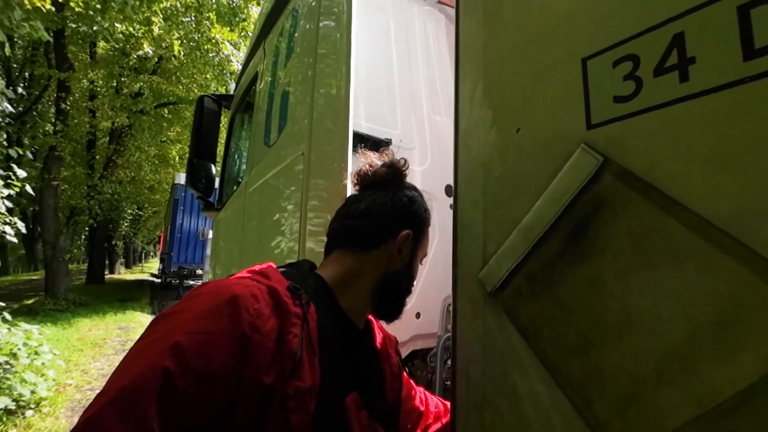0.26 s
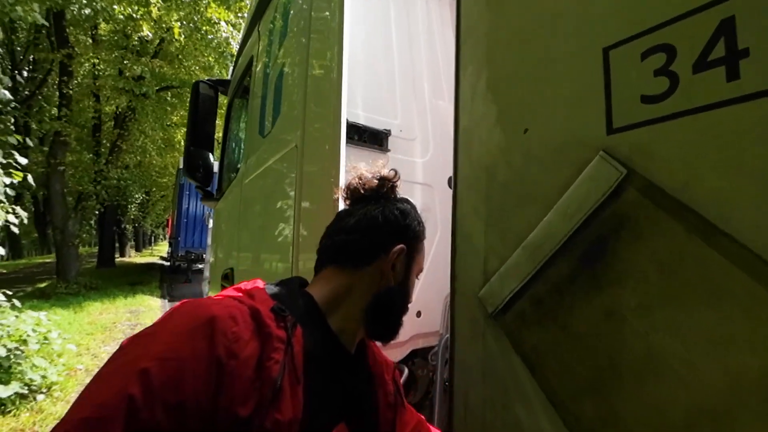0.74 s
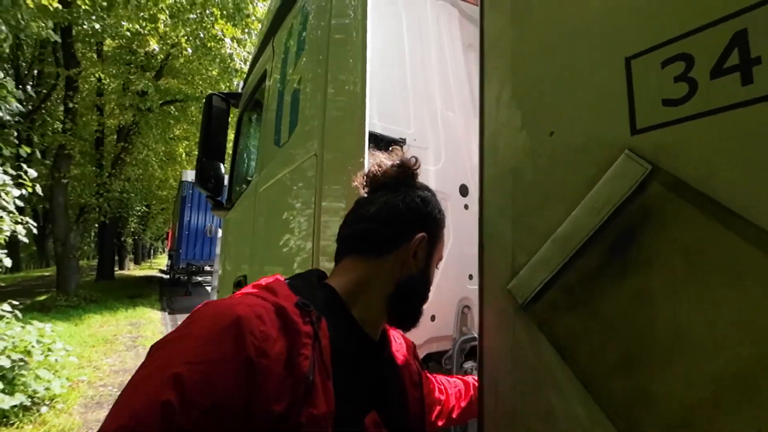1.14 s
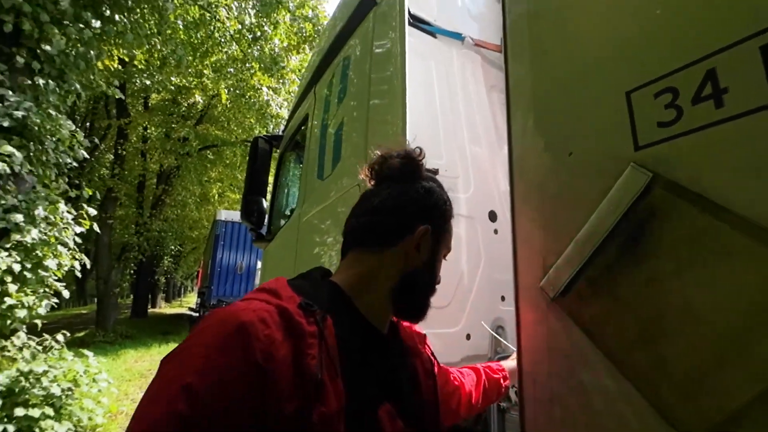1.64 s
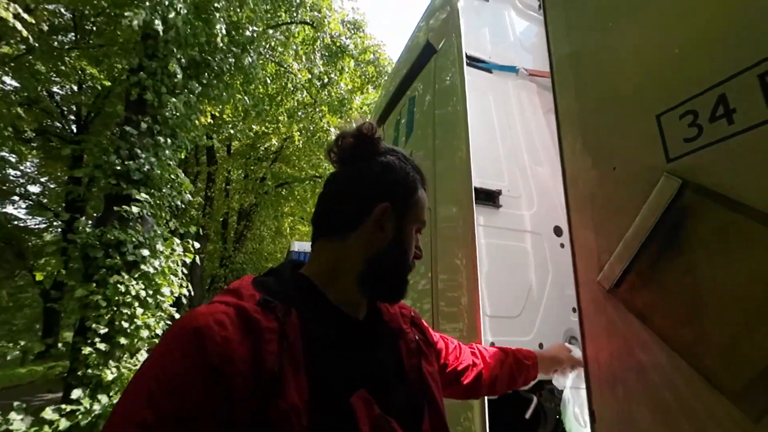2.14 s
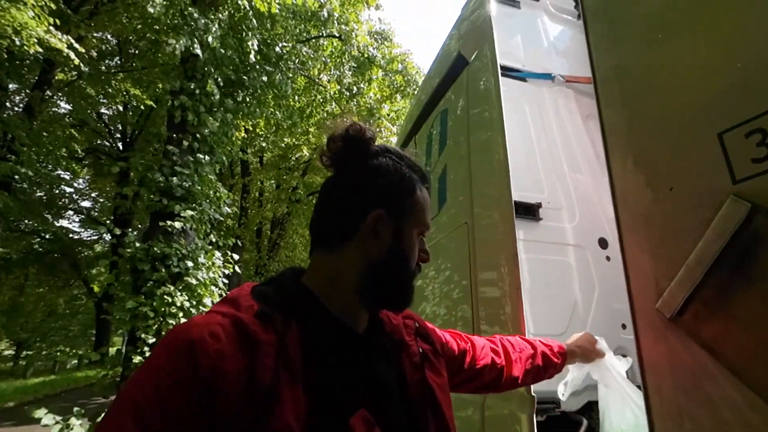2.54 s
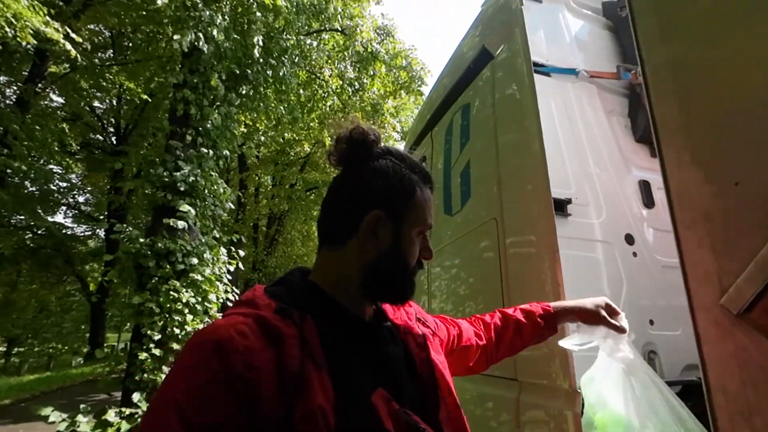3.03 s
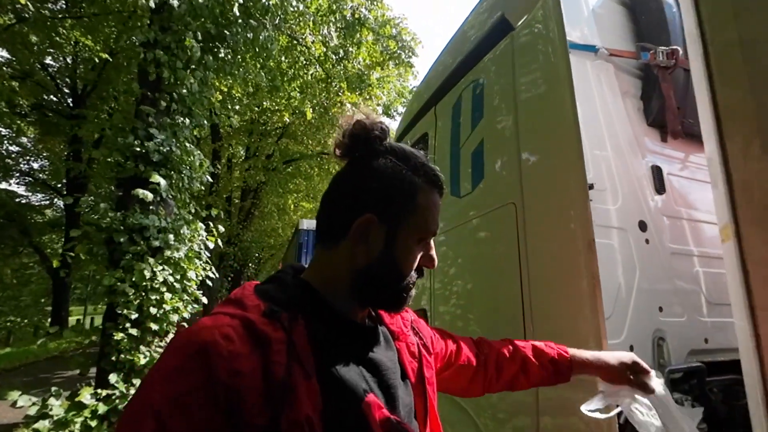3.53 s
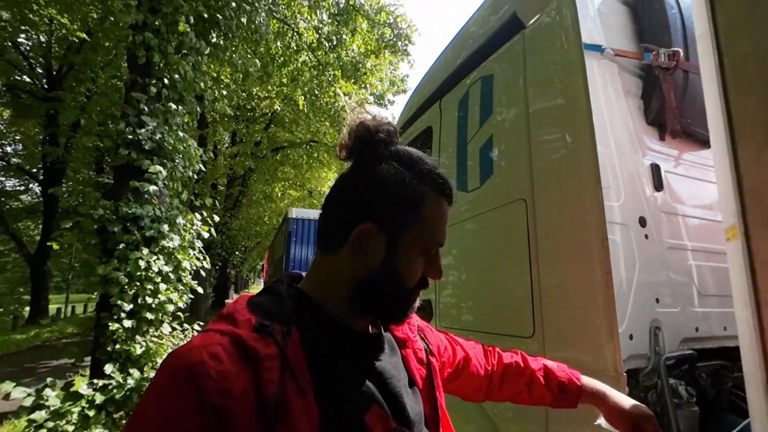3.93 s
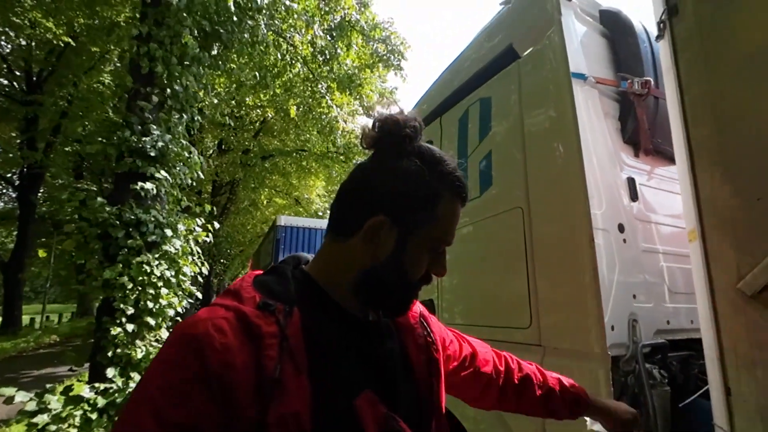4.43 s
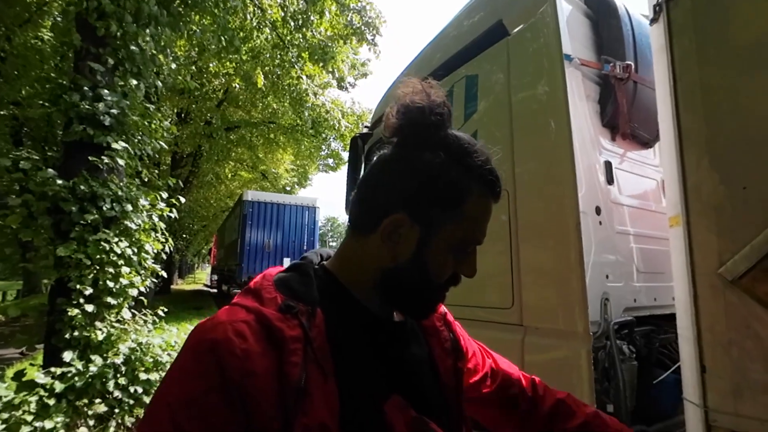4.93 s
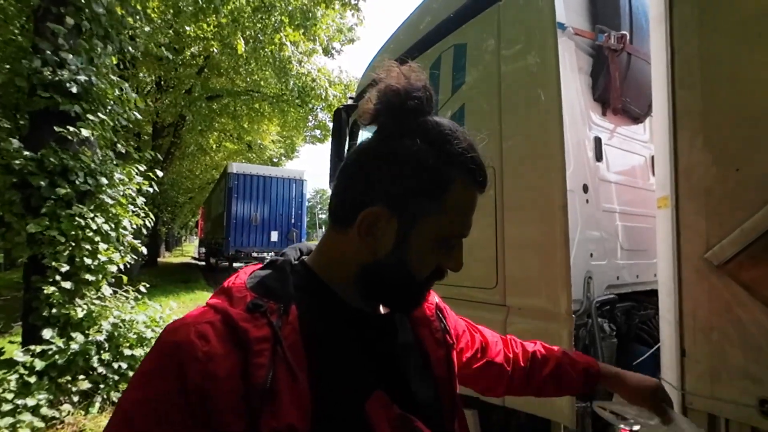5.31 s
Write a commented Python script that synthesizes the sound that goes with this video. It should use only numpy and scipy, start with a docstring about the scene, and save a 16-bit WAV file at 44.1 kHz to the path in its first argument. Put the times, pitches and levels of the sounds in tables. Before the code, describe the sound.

In a narrow metal gap behind a lorry cab, light empties bump with dry, hollow, pitched knocks and a short glassy ring. The bag rustles lightly between them. From just past halfway the knocking stops and sharp plastic crunches dominate, wind buffeting the close stereo microphone, before two small clinks near the end. Tree hush stays quiet underneath.

```python
"""In the gap behind a lorry cab, empty plastic bottles and cans knock together in a thin bag. Wind rumble and
tree hush are shaped noise, with single low puffs and thumps. The bag rustles and crunches: random snaps of
film, which also sound the air caught inside. Each knock is a noise burst with wall modes and a pitched ring;
short pings and longer rings join in."""
import sys
import numpy as np
from scipy import signal
from scipy.fft import rfft, irfft, next_fast_len
from scipy.io import wavfile
from scipy.ndimage import uniform_filter1d

SR = 44100
rng = np.random.default_rng(int(sys.argv[2]) if len(sys.argv) > 2 else 0)


def pcm_store(signal):
    """Save signal as 16-bit PCM."""
    levels = np.round(np.clip(np.atleast_2d(signal), -1, 1) * 32767)
    wavfile.write(sys.argv[1], SR, levels.astype(np.int16).T)


N = 245503  # samples


def amp(db):
    """Decibels to a linear factor."""
    return 10 ** (np.asarray(db) / 20)


def evened(x):
    """Scales a sound to an RMS of one."""
    return x / np.sqrt(np.mean(x ** 2) + 1e-20)


def read(points, hz):
    """Reads a frequency table with straight lines over log frequency."""
    f, value = np.transpose(points)
    return np.interp(np.log(hz + 1), np.log(f + 1), value)


def level_curve(points):
    """Linear level over the whole scene, drawn with straight lines in dB."""
    start_s, level_db = np.transpose(points)
    return amp(np.interp(np.arange(N) / SR, start_s, level_db))


def coloured(x, db_at):
    """Filters each row of x by a level rule over frequency, without phase shift."""
    size = next_fast_len(x.shape[-1])
    gain = amp(db_at(np.fft.rfftfreq(size, 1 / SR)))
    return irfft(rfft(x, size) * gain, size)[..., :x.shape[-1]]


def wander(shape, width, depth_db):
    """Random level drift: noise averaged over width samples, swinging by depth_db RMS."""
    return amp(depth_db * evened(uniform_filter1d(rng.standard_normal(shape), width)))


def add(mix, start_s, sound):
    """Lays a stereo sound into the mix, cut off at the end of the scene."""
    part = mix[:, round(start_s * SR):][:, :sound.shape[1]]
    part += sound[:, :part.shape[1]]


# How alike left and right are before diffuseness: pitch_hz, shared (0 to 1)
LIKENESS = [(80, 1), (450, 0.92), (700, 0.7), (1150, 0.86), (1300, 1), (2500, 0.63), (5000, 0.57),
            (10000, 0.073), (15000, 0.76)]
# Full shadow between the two ports: pitch_hz, left_minus_right_db
SHADOW = [(500, 0), (1000, -0.5), (2300, -1.5), (3000, -4), (9300, -3), (9700, 0.5)]
# Directions: left lag in the upper band (s), diffuseness (power of likeness), share of the shadow
FROM_GAP, FROM_BAG, FROM_TREES = (55e-6, .9, .8), (70e-6, 1., 1.13), (15e-6, 3, 0.4)


def ports(pair, direction):
    """Turns two versions of a sound into left and right by shared part, path lag and shadow."""
    size = next_fast_len(N)
    lag_s, diffuseness, shade = direction
    hz = np.fft.rfftfreq(size, 1 / SR)
    shared = np.clip(read(LIKENESS, hz), 0, 1 - 1 / 200) ** diffuseness
    first, second = rfft(pair, size)
    stretch = np.interp(hz, [1120, 1280], [4., 1])  # the lag is longer in the lower band
    # half of the lag and shadow goes to each side
    half = amp(shade * read(SHADOW, hz) / 2) * np.exp(-1j * np.pi * hz * lag_s * stretch)
    left = first * half
    right = (shared * first + np.sqrt(1 - shared ** 2) * second) / half
    return irfft(np.array([left, right]), size)[:, :N]


# Wind level, joined by straight lines: start_s, level_db
GUSTS = [(0, -41.5), (.9, -45.5), (1.5, -42), (1.8, -45.5), (2.9, -43.5), (3.3, -47.5), (4.3, -48),
         (4.4, -37), (4.84, -32.5), (4.88, -48), (5.0, -37.5), (5.2, -49), (5.57, -48.5)]
# Tone of the wind rumble: pitch_hz, density_db (per Hz)
WIND = [(8.8, -35), (15, 3), (54, -1), (109, -4), (204, -17.5), (274, -17), (500, -26), (650, -62),
        (1100, -120)]
# Single low puffs and thumps: centre_s, peak_db, pitch_hz
THUMPS = [(2.965, -27, 35), (3.993, -27.5, 108), (4.656, -26.5, 60), (4.693, -23.5, 45), (4.712, -23, 60),
          (4.791, -18.5, 87), (4.847, -22, 70)]
# Tone of leaves and far traffic: pitch_hz, density_db (per Hz)
HUSH = [(59, -60), (100, -15), (121, -0.5), (214, -6), (457, -9), (742, -8), (879, -12.5), (1430, -13.5),
        (1800, -15), (3120, -12), (10200, -23), (13700, -32), (15500, -72)]
HUSH_DB = -49


def outdoors():
    """Lumpy low noise makes the wind, joined by short bell-shaped low thumps; steady noise makes the hush."""
    t = np.arange(N) / SR
    rumble = evened(coloured(rng.standard_normal((2, N)), lambda hz: read(WIND, hz)))
    wind = level_curve(GUSTS) * wander(N, 2000, 2) * rumble
    for centre_s, peak_db, pitch_hz in THUMPS:
        since = t - centre_s
        bell = np.exp(-(2.05 * pitch_hz * since) ** 2)
        wind = wind + amp(peak_db) * np.cos(2 * np.pi * pitch_hz * since) * bell
    hush = evened(coloured(rng.standard_normal((2, N)), lambda hz: read(HUSH, hz)))
    return ports(wind + amp(HUSH_DB) * hush, FROM_TREES)


def resonate(x, hz, width_hz):
    """An air pocket: one resonance driven by x, evened in level."""
    r = np.exp(-np.pi * width_hz / SR)
    return evened(signal.lfilter([1, 0, -1], [1, -2 * r * np.cos(2 * np.pi * hz / SR), r * r], x))


# Steady rustle, joined by straight lines: start_s, hiss_db
RUSTLE = [(0, -44), (.28, -45.5), (.45, -55.5), (.62, -56), (.72, -42.5), (.88, -49), (1.0, -37),
          (1.2, -48), (1.5, -52), (1.6, -57), (1.9, -62), (2.15, -47), (2.6, -42), (2.8, -51.5),
          (3.05, -40.5), (3.17, -49.5), (3.63, -48.5), (3.85, -35.5), (4.4, -35.5), (5.57, -41)]
# Crunches at their loudest moment: centre_s, level_db, swell_s (time constant), body_db (against hiss)
CRUNCHES = [(.533, -51, .005, 5), (.99, -54.5, 0.043, 13.5), (2.225, -41, 0.016, -6),
            (3.215, -56.5, 0.0026, 14), (3.237, -31, 0.0093, -2), (3.318, -38, 0.021, 2),
            (3.548, -33, 0.062, -4), (3.693, -33, 0.016, 7.5), (3.996, -18.5, 0.017, 4),
            (4.348, -25, 0.016, 6), (4.43, -44.5, 0.03, 14), (4.501, -43, 0.013, 13.5),
            (4.615, -33, 0.034, 1), (4.771, -34, .017, 2.5), (4.866, -45.5, 0.0099, 13),
            (4.939, -42.5, 0.016, 13), (4.983, -23, 0.016, 4), (5.05, -39, 0.05, 6),
            (5.295, -22, 0.028, -2), (5.56, -33.5, 0.058, -4.5)]
# Tone of the creasing film: pitch_hz, density_db (per Hz)
FILM = [(150, -20), (250, -9.5), (420, -10.5), (700, -8.5), (1100, -9.5), (1300, -6), (2300, -7),
        (5500, -9), (10000, -12), (12000, -16), (14200, -19), (15000, -35), (15700, -36)]
# Air caught in the bag and bottles: pitch_hz, width_hz, level_db (within the pockets)
POUCH = [(396, 56, -2.5), (1370, 560, -6), (3300, 910, -0.5)]
RUSTLE_BODY_DB, POUCH_DB = -4, -23.5  # rustle body against its hiss; pockets against the dull film
LINGER = 1.044  # a crunch dies this many times slower than it swells
SNAPS_PER_S = 12000


def bag():
    """Dense snaps of creasing film; the same snaps sound the air pockets."""
    t = np.arange(N) / SR
    hiss = level_curve(RUSTLE)
    body = amp(RUSTLE_BODY_DB) * hiss
    for centre_s, level_db, swell_s, body_db in CRUNCHES:
        since = t - centre_s
        swell = amp(level_db) * np.exp(np.where(since < 0, since, -since / LINGER) / swell_s)
        hiss = hiss + swell
        body = body + swell * amp(body_db)

    strength = amp(2.9 * np.minimum(rng.exponential(1, (2, N)), 5))
    snaps = strength * (rng.random((2, N)) < SNAPS_PER_S / SR) * rng.choice([-1., 1.], (2, N))
    film = evened(coloured(snaps, lambda hz: read(FILM, hz)))
    dull = coloured(film, lambda hz: -10 * np.log10(1 + (hz / 3000) ** 4))
    fine = coloured(film, lambda hz: -10 * np.log10(1 + (8500 / (hz + 1)) ** 8))  # smallest creases
    middle = film - dull - fine
    pockets = sum(amp(db) * resonate(dull, hz, width_hz) for hz, width_hz, db in POUCH)

    middle_runs, body_runs, fine_runs = wander((3, N), 250, 0.67)  # creases give way in runs
    crackle = hiss * (middle_runs * middle + fine_runs ** 1.1 * fine)
    thickness = body_runs * body * (dull + amp(POUCH_DB) * pockets)
    return ports(crackle + thickness, FROM_BAG)


def ring(t, hz, db, t60_s):
    """A dying tone, in two versions a quarter turn apart."""
    return amp(db - 60 * t / t60_s) * np.sin(2 * np.pi * hz * t + [[0], [np.pi / 2]])


# Tone of the clatter before the blow's own tilt: pitch_hz, density_db (per Hz)
CLATTER = [(47, -41), (80, -25), (155, -16), (230, -3.5), (678, -2), (791, -6), (986, -6), (1710, -3.5),
           (3620, -10.5), (10200, -19.5), (15500, -30)]
# Walls and air of empty bottles, before random spread: pitch_hz, level_db, t60_s (usual blow)
HOLLOW = [(145, -13.5, 0.13), (231.7, -14, 0.23), (303, -11.5, 0.31), (517.3, -7.5, 0.19),
          (635, -18.5, 0.59), (808, -7, 0.16), (911, -7.5, 0.14), (1090, -10, 0.13), (1268, -6, 0.1),
          (1490, -4, 0.12), (1748, 7, 0.029), (2330, -20, 0.15), (2302, -7.5, 0.15), (2774, -9, 0.04),
          (2970, -10, .1)]
CLATTER_DB, WALLS_DB, RING_DB = -7, -9, -5.5  # parts of a blow against its level
GAP_DB = -9.5  # metal tail against the clatter's start
CLATTER_T60, RING_T60 = 0.13, .15  # s, for a blow of usual strength
GAP_T60, TREBLE_T60 = 0.47, 3.2  # s; the treble loss comes on top of the clatter's decay
USUAL_DB, DAMPING = -19, 0.11  # harder blows die faster: dB of decay rate per dB of strength
HARD_RISE_S, SOFTENING = 0.00094, 0.18  # rise of a 0 dB blow; dB of rise time per dB of weakness


def blow(level_db, thud_db, edge_db, crack_db, pitch_hz):
    """A knock: noise with small rebounds, randomly excited wall modes and one pitched ring."""
    t = np.arange(int(.45 * SR)) / SR
    haste = amp(DAMPING * (level_db - USUAL_DB))
    aged = t * haste

    def low(hz):
        return 1 / (1 + (hz / 500) ** 4)

    def high(hz):
        return 1 / (1 + (3000 / (hz + 1)) ** 4)

    def tilt(hz):
        return thud_db * low(hz) + crack_db * high(hz) + edge_db * (hz > 1250) * (1 - high(hz))

    ripple_db = 6 * rng.standard_normal(size=40)  # crowded small modes, one every 140 Hz

    def clatter_tone(hz):
        ripple = np.interp(hz / 140, np.arange(len(ripple_db)), ripple_db)
        return read(CLATTER, hz) + tilt(hz) + (1 - high(hz)) * ripple

    noise = evened(coloured(rng.standard_normal((2, len(t))), clatter_tone))
    crack = coloured(noise, lambda hz: 20 * np.log10(high(hz) + 1e-5))
    noise = noise - crack * (1 - amp(-60 * t / TREBLE_T60))  # the treble dies a little sooner
    rebounds = wander(len(t), 180, 1.58)
    gap_tail = amp(GAP_DB - 60 * t / GAP_T60)  # the metal walls of the gap hold a faint tail
    clatter = noise * (rebounds * amp(-60 * aged / CLATTER_T60) + gap_tail)

    hz, mode_db, mode_t60 = np.transpose(HOLLOW)[:, :, None]
    luck, phase = rng.standard_normal((2, 2, len(hz), 1))
    hz = hz * (1 + 0.0361 * rng.standard_normal(hz.shape))  # no two bottles are alike
    mode_level = amp(mode_db + tilt(hz) + 5.16 * luck - 60 * aged / mode_t60)
    walls = (mode_level * np.sin(2 * np.pi * hz * t + 9 * phase)).sum(1)

    parts = amp(CLATTER_DB) * clatter + amp(WALLS_DB) * walls
    parts = parts + ring(t, pitch_hz, RING_DB, RING_T60 / haste)
    rise = 1 - np.exp(-t / (HARD_RISE_S * amp(-SOFTENING * level_db)))  # light touches start softer
    return amp(level_db) * parts * rise


# Knocks: start_s, level_db, thud_db (below 500 Hz), edge_db (1250 Hz to about 3 kHz),
# crack_db (above 3 kHz), pitch_hz (of the bottle struck)
BLOWS = [(.004, -31, 12, 3.5, -2, 1440), (0.075, -32, -8, 1, -5, 1700), (.139, -22.5, 8, -5, -6, 419),
         (.179, -20.5, -26, 0.5, -5, 725), (.209, -29, 10, -11, 3.5, 515), (.249, -34, 9, -15, 10, 695),
         (.95, -31, 5, -24, 8, 390), (1.024, -18.5, 3, -9, -7, 417), (1.038, -22.5, 12, 0, 13, 450),
         (1.082, -11, 3, -3, -11, 498), (1.161, -36, -11, -19, -26, 900), (1.208, -22.5, -4, -18, -4, 522),
         (1.228, -12.5, 0, 1, 4.5, 952), (1.252, -22.5, 4, 8, -9, 413), (1.316, -24.5, 3, -3, -5, 505),
         (1.392, -23.5, 18, 3.5, 10, 228), (1.409, -19, -9, -4, -22, 476),
         (1.425, -18.5, 7.5, -6, 0.5, 509), (1.461, -20.5, -2, 3.5, -3, 957),
         (1.488, -27.5, 16, -3, -12, 518), (1.824, -24.5, -13.5, -14, -19.5, 892),
         (1.927, -21.5, -6, 1, -10, 472), (1.99, -21.5, 4, 3.5, 2.5, 278),
         (2.057, -11, -23, -5.5, -12, 969), (2.069, -17, -4, 10, 7.5, 1200),
         (2.136, -24.5, 10.5, 3.5, 2.5, 564), (2.156, -20.5, 3, -8, -8, 837),
         (2.353, -22.5, -1.5, 3.5, -12, 1246), (2.545, -23, 0.5, -7.5, -18, 562),
         (2.664, -17, -14, -7, -12.5, 788), (2.757, -26.5, -6, -15, -5, 658),
         (2.777, -19, -10.5, -3.5, -8, 509), (2.951, -5, -6, -0.5, -11, 1126), (2.983, -20, 7, -2, 18, 617),
         (3.029, -19.5, 8, -12, -1, 887), (3.072, -24, 0, 2, 2, 1550), (3.085, -32, 9, 3, -8, 1534),
         (4.925, -29.5, 8, 2, -1, 2190), (5.231, -26, -12, 5, -4, 1480)]
# Single short pings: start_s, pitch_hz, level_db
PINGS = [(.077, 1710, -45), (1.083, 1654, -14), (1.228, 3080, -18), (1.232, 2440, -25), (1.4, 162, -18.5),
         (2.06, 1137, -15), (2.08, 3150, -26), (2.14, 2350, -40), (2.515, 3300, -35.5), (2.955, 807, -7.5),
         (2.991, 297, -21), (3.649, 1253, -33), (4.961, 1499, -22), (4.979, 3070, -21),
         (5.234, 1485, -20.5), (5.235, 2150, -27), (5.288, 2355, -22)]
# Modes of the glass, the can and the jug: pitch_hz, level_db, t60_s
GLASS, CAN, JUG = [(2586, 1, 0.23), (2590, -5.5, .2)], [(510, 0.019, 0.87)], [(391, 0, 0.14)]
# When each is set going: start_s, level_db
GLASS_STRUCK, CAN_STRUCK, JUG_STRUCK = [(1.254, -22)], [(1.5, -43), (2.667, -34), (2.78, -33)], [(4.965, -23.5),
                                                                                  (5.265, -30),
                                                                                  (5.3, -26.5)]
PING_T60, PING_RISE_S = 0.12, 0.0013  # s; the rise also softens the rings of glass, can and jug


def bottles():
    """Knocks as broad bursts, pings and the rings of glass, can and jug as softly started dying tones."""
    out = np.zeros((2, N))
    t = np.arange(int(.6 * SR)) / SR
    rise = 1 - np.exp(-t / PING_RISE_S)
    for start_s, *strike in BLOWS:
        add(out, start_s, blow(*strike))
    for start_s, pitch_hz, level_db in PINGS:
        add(out, start_s, rise * ring(t, pitch_hz, level_db, PING_T60))
    for modes, strikes in (GLASS, GLASS_STRUCK), (CAN, CAN_STRUCK), (JUG, JUG_STRUCK):
        for start_s, level_db in strikes:
            add(out, start_s, amp(level_db) * rise * sum(ring(t, *mode) for mode in modes))
    return ports(out, FROM_GAP)


def scene():
    """Wind and trees, the bag, and the bottles and cans in it."""
    return outdoors() + bag() + bottles()


EDGE_HZ = 15740  # upper band limit


def record(dry):
    """The hard ceiling of the converter, then a steep low-pass as the band limit."""
    edge = signal.firwin(1023, EDGE_HZ, window=("kaiser", 9), fs=SR)
    return signal.oaconvolve(np.clip(dry, -1, 1), edge[None], "same")


dry = scene()
out = record(dry)
pcm_store(out)
```